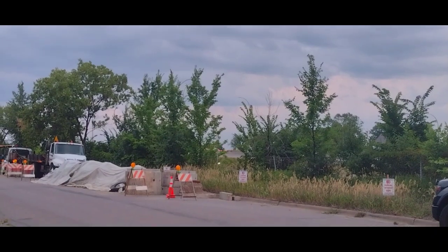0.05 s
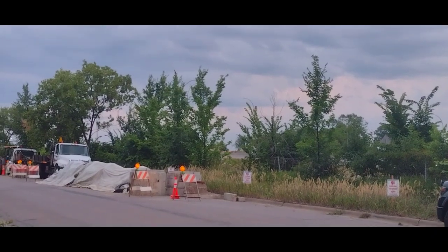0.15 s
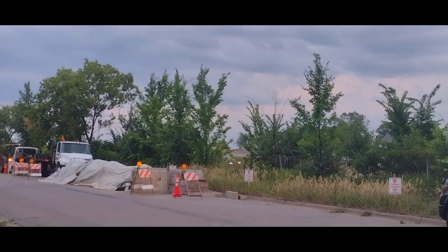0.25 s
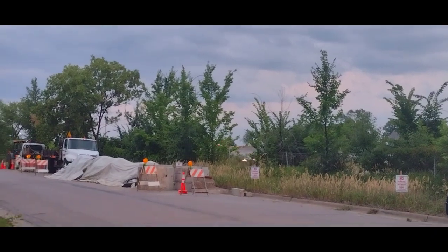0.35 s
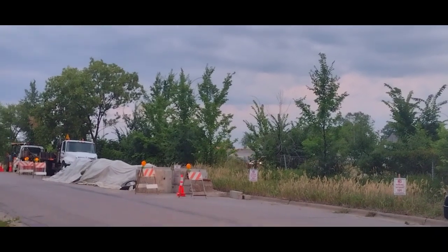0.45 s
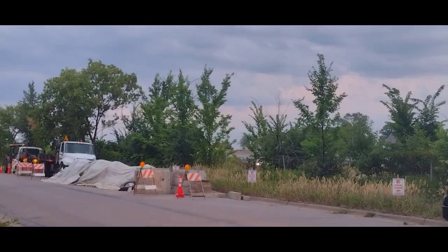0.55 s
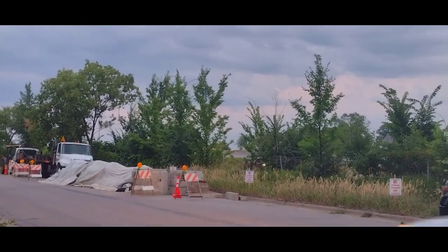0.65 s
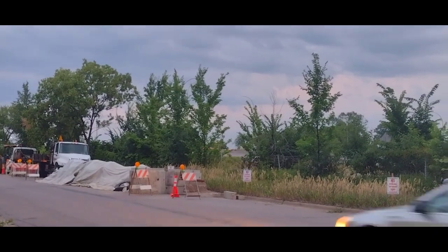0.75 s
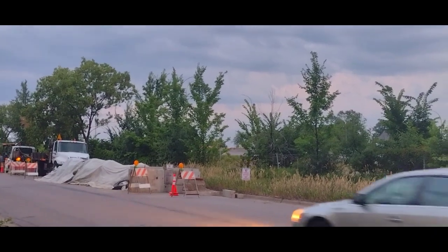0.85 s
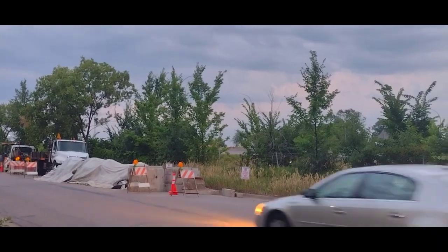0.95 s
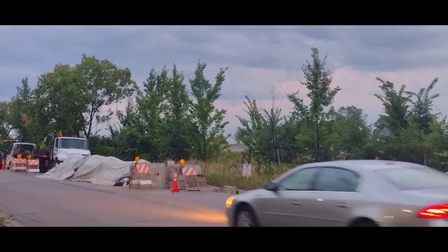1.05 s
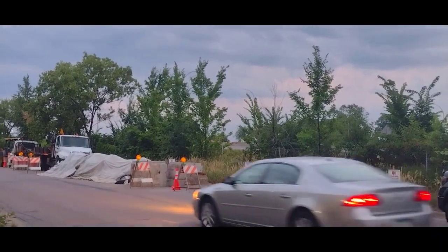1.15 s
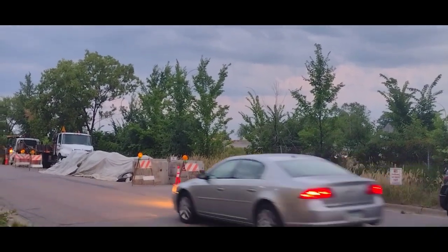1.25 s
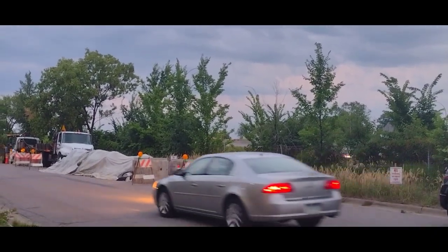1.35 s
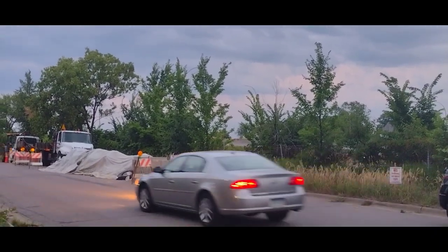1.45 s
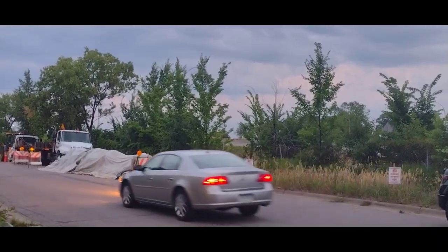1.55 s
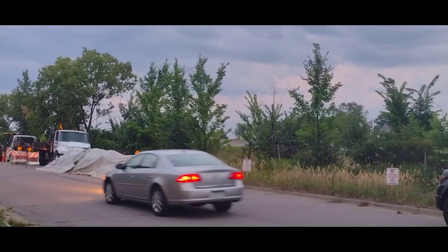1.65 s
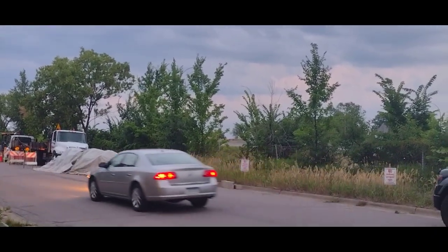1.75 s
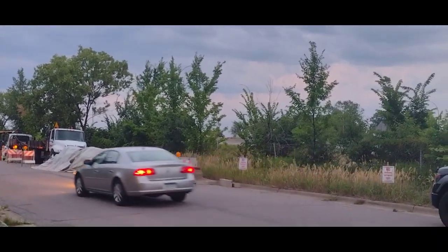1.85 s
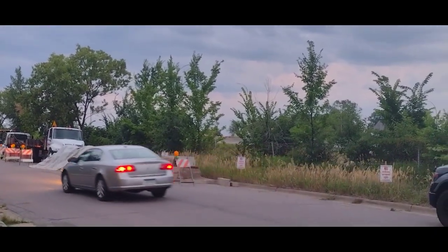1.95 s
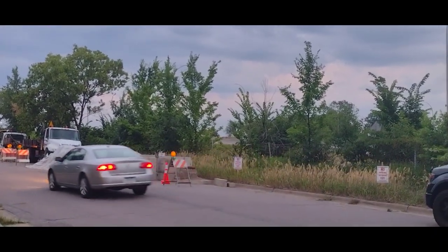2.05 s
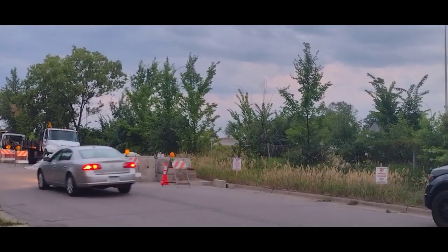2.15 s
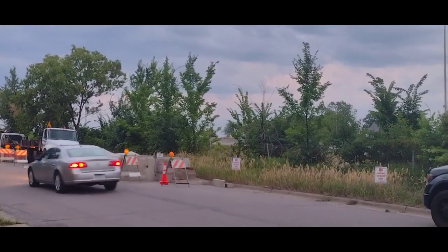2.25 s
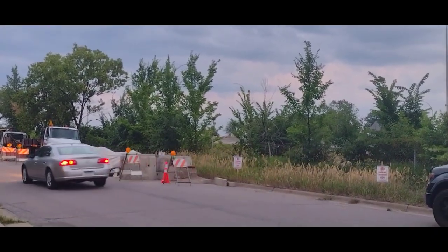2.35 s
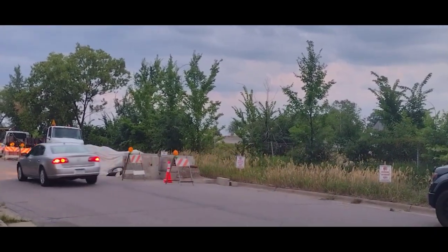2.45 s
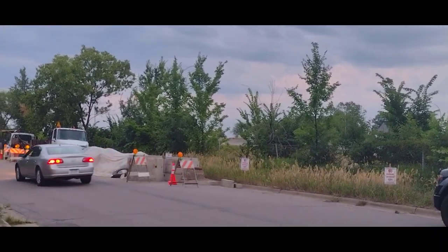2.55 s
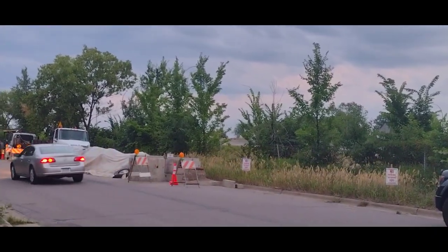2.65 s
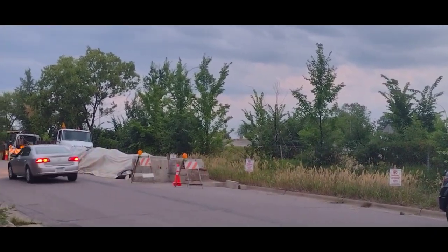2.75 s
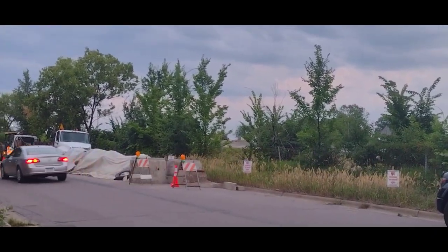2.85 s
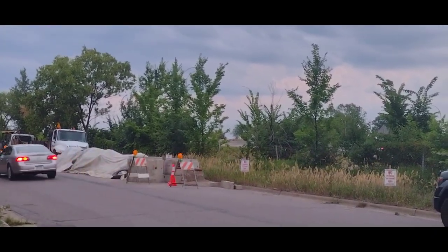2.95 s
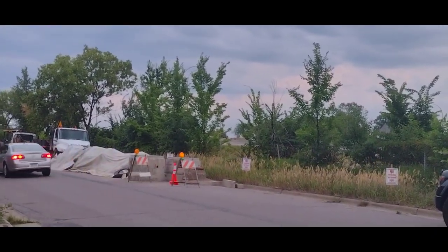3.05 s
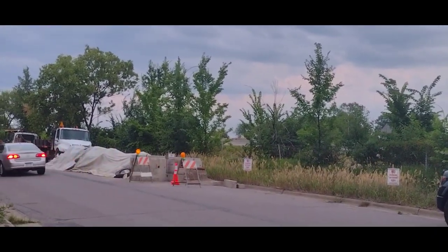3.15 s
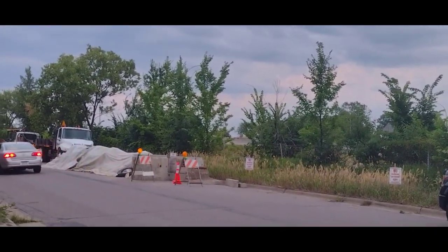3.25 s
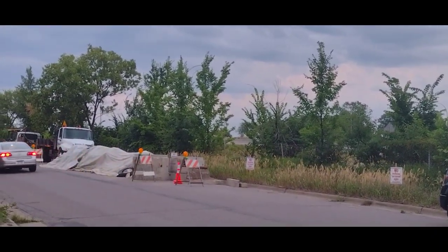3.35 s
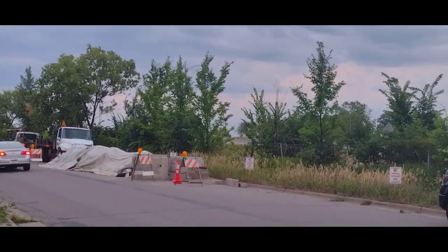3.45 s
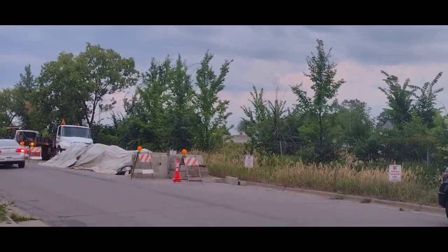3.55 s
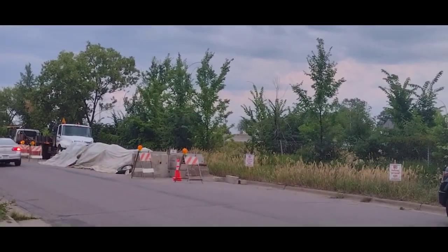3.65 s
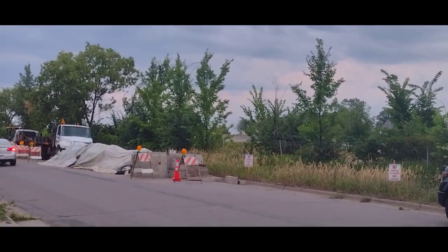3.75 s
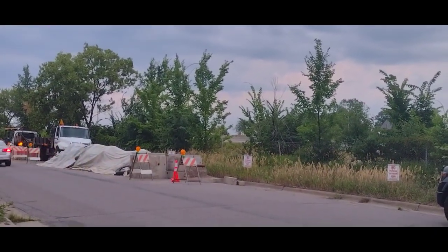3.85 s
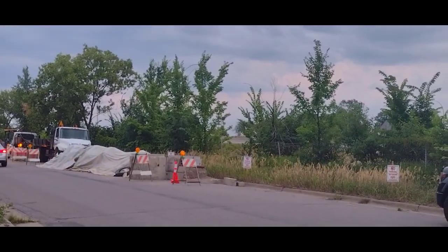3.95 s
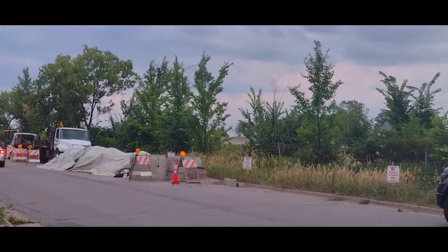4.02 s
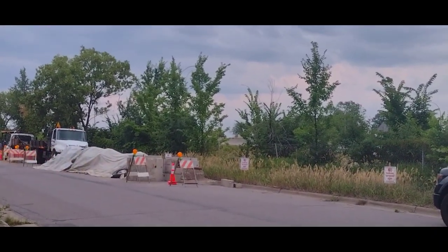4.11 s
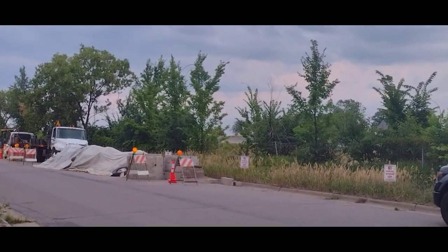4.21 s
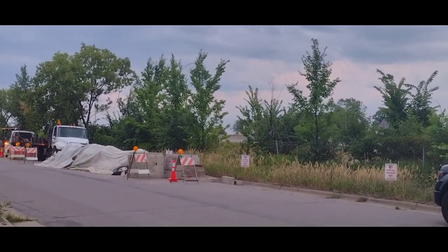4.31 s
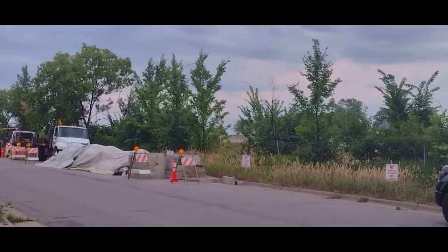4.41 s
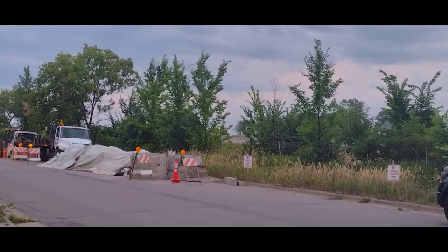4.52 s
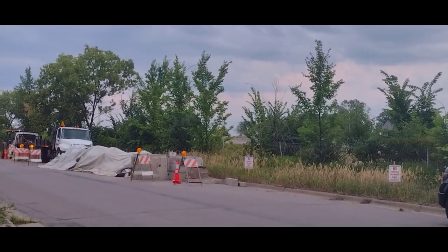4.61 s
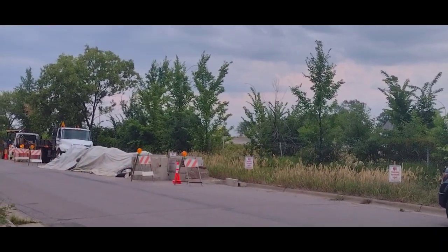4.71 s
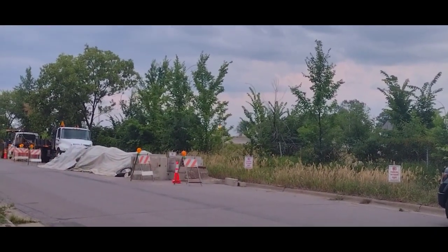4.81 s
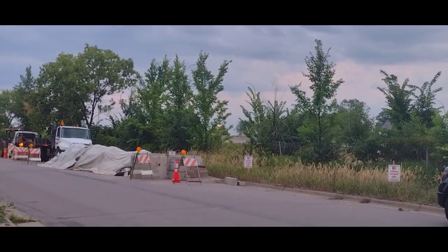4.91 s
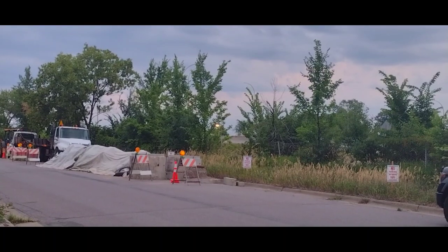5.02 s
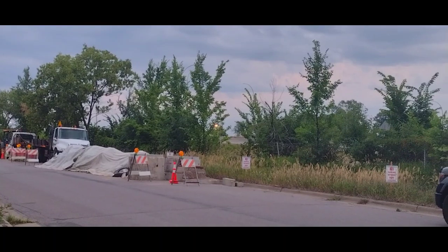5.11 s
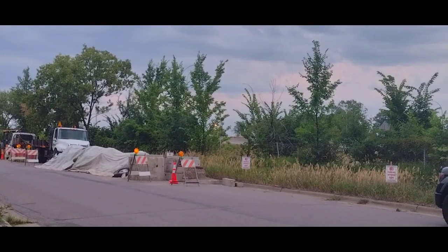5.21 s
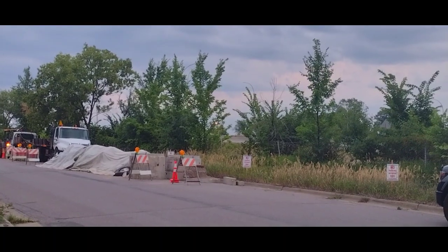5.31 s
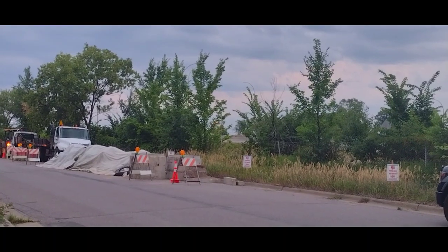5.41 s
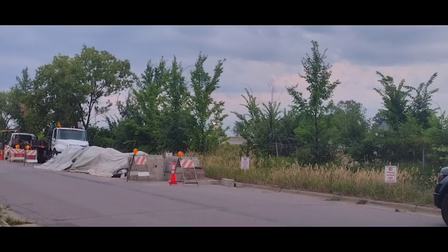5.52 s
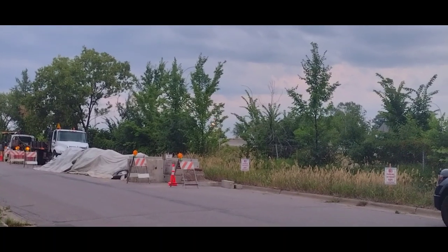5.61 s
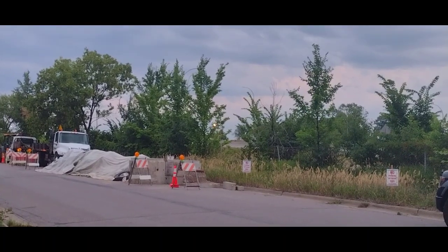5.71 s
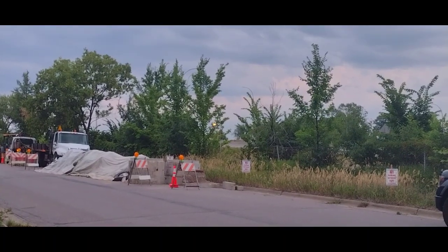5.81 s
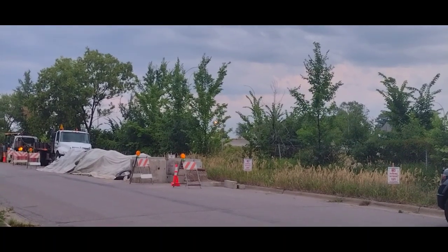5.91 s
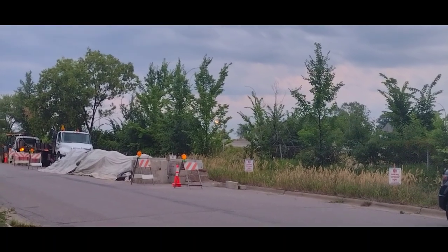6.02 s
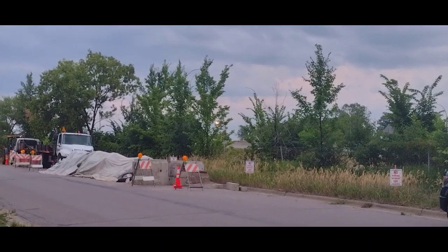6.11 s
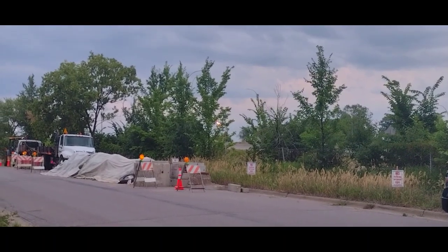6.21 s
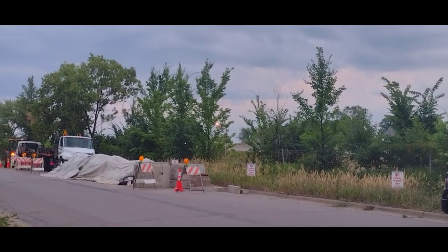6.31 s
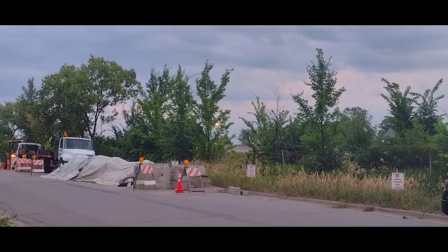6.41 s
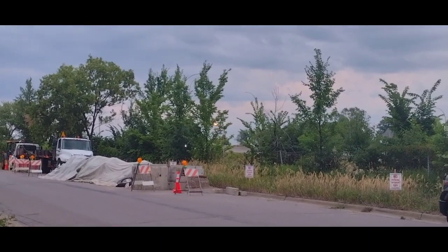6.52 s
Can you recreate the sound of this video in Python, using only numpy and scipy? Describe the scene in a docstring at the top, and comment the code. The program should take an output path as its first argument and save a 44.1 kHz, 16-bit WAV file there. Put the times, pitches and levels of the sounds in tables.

```python
"""Wind buffets thump, mostly on the left port, as a saloon car passes close by over main-road traffic.
The car drives off, its exhaust booming briefly; the rush of an approaching jet begins to rise at the end.
Wind, tyres, traffic and jet are coloured noise, steered by port delay or scattered all around.
The exhaust is a sum of sines on multiples of the firing rate; grit is sparse random ticks."""
import sys
import numpy as np
from scipy import signal
from scipy.fft import rfft, irfft, next_fast_len
from scipy.io import wavfile
from scipy.ndimage import uniform_filter1d, map_coordinates

SR = 44100
rng = np.random.default_rng(int(sys.argv[2]) if len(sys.argv) > 2 else 0)


def wav_out(sig):
    """Save sig, one row per channel (or a flat mono array), as 16-bit PCM at SR to the path in sys.argv[1]."""
    wavfile.write(sys.argv[1], SR, np.round(np.clip(np.atleast_2d(sig).T, -1, 1) * 32767).astype(np.int16))


N = 289737
TIME = np.arange(N) / SR


def amp(db):
    """Decibels to gain."""
    return 10 ** (np.asarray(db) / 20)


def unit(x):
    """Scale to rms 1, all channels together."""
    return x / np.sqrt(np.mean(x ** 2) + 1e-20)


def along(points, hz):
    """Read (f/Hz, value) points on a log frequency axis."""
    f, value = np.transpose(points)
    return np.interp(np.log(hz + 1), np.log(f + 1), value)


def curves(rows):
    """One value per sample for each column after the time."""
    t_s, *columns = np.transpose(rows)
    return [np.interp(TIME, t_s, column) for column in columns]


def wobble(knots_per_s):
    """Smooth random curve through normally distributed knots."""
    knots = rng.standard_normal(int(N * knots_per_s / SR) + 4)
    return map_coordinates(knots, [TIME * knots_per_s])


def swell(t_s, length_s):
    """Bell-shaped rise and fall around t_s = 0, down to exp(-2) at +-length_s."""
    return np.exp(-2 * (t_s / length_s) ** 2)


def filtered(x, response):
    """Multiply the spectrum of x by a response of frequency."""
    n = x.shape[-1]
    padded = next_fast_len(n + 2 ** 13, True)
    spectrum = rfft(x, padded) * response(np.fft.rfftfreq(padded, 1 / SR))
    return irfft(spectrum, padded)[..., :n]


def noise(spectrum):
    """Coloured noise, rms 1."""
    return unit(filtered(rng.standard_normal(N), lambda hz: amp(along(spectrum, hz))))


# likeness of scattered sound at the two ports: f/Hz, correlation
PORT_LIKENESS = [(60, 0.94), (250, 0.83), (400, 0.66), (650, 0.3), (1000, -0.27), (1400, -0.44),
                 (2200, 0.23), (4000, -0.048)]


def scattered(spectrum):
    """Stereo noise from all around: most alike at both ports in the bass, rms 1."""
    def response(hz):
        turn_rad = np.arccos(np.clip(along(PORT_LIKENESS, hz), -1, 1)) / 2
        return amp(along(spectrum, hz)) * [np.cos(turn_rad), np.sin(turn_rad)]
    mid, side = filtered(rng.standard_normal((2, N)), response)
    return unit(np.array([mid + side, mid - side]))


def delayed(x, delay_ms):
    """x after a fixed or moving delay."""
    return map_coordinates(x, [np.arange(N) - delay_ms * SR / 1000], mode="mirror")


def arriving(x, lag_ms):
    """Sound from the right (lag_ms > 0) reaches the left port later."""
    return np.array([delayed(x, lag_ms), x])


def rush(spectrum, lag_ms, direct):
    """Noise near rms 1: a power share comes straight from its bearing, the rest off road and trees."""
    share = np.clip(direct, 0, 1)
    straight = np.sqrt(share) * arriving(noise(spectrum), lag_ms)
    return straight + np.sqrt(1 - share) * scattered(spectrum)


def patchy(pair, depth_db):
    """Moving air and shifting reflections lift and sink narrow bands for a quarter second or so."""
    bins = signal.stft(pair, nperseg=1024)[2]
    field = rng.standard_normal(bins.shape[1:])
    field = uniform_filter1d(field, size=5, axis=0)  # over frequency
    field = uniform_filter1d(field, size=24, axis=1)  # over time
    shaped = bins * amp(depth_db * unit(field))
    return unit(signal.istft(shaped, nperseg=1024)[1][:, :N])


# turbulence spectrum before the cutoff: f/Hz, level/dB per Hz (relative)
EDDY_SPECTRUM = [(15, -36), (45, -20), (90, 2), (160, 3), (250, 4.5)]


def eddies(top_hz, size):
    """Low turbulent pressure on a port, cut off steeply above top_hz, rms 1."""
    def response(hz):
        return amp(along(EDDY_SPECTRUM, hz)) / np.sqrt(1 + (hz / top_hz) ** 9)
    return unit(filtered(rng.standard_normal(size), response))


# hardest wind thumps, left port: t/s, level/dB, length/s, top f/Hz
WIND_THUMPS = [(0.017, -23, 0.034, 270), (0.046, -19, 0.016, 325), (0.221, -13.5, 0.018, 345),
               (0.246, -12.5, 0.024, 375), (0.269, -8.5, 0.0099, 320), (0.3, -23.5, 0.039, 228),
               (0.344, -18, 0.023, 288), (.489, -24.5, 0.021, 260), (0.672, -17.5, 0.021, 207),
               (.725, -26, 0.067, 260), (.87, -23.5, 0.031, 150), (0.913, -20.5, 0.035, 153)]
# gusts full of small eddies: t/s, level/dB, length/s, port (0 left, 1 right)
WIND_GUSTS = [(0.357, -30, 0.3, 0), (0.486, -31, 0.11, 1), (0.784, -31, 0.085, 0), (1.336, -28.5, 0.16, 0)]
# thin wind hiss: t/s, level/dB, half length/s
WIND_SIZZLES = [(0.155, -57, 0.045), (0.243, -50, 0.029)]
# thin hiss, also colours the tyre grit: f/Hz, level/dB per Hz (relative)
SIZZLE_SPECTRUM = [(2000, -43), (6500, -7), (8500, 1), (12000, -8), (15500, -3)]
GUST_TOP_HZ, GUST_LUMPS_DB, GUST_LUMP_KNOTS_PER_S = 154, 1.5, 27


def wind():
    """Big eddies thump on the left port, gusts flutter with small ones, and thin hiss sizzles early on."""
    out = np.zeros((2, N + SR))
    t_s = np.arange(-SR // 8, SR // 8) / SR
    for centre_s, db, length_s, top_hz in WIND_THUMPS:
        shape = swell(t_s, length_s)
        thump = shape * eddies(top_hz, size=len(t_s))
        thump *= np.linalg.norm(shape) / np.linalg.norm(thump)  # same energy at every draw
        start = round((centre_s + t_s[0]) * SR) + SR // 2  # half a second of lead-in
        out[0, start:][:len(t_s)] += amp(db) * thump
    out = out[:, SR // 2:][:, :N]
    for centre_s, db, length_s, port in WIND_GUSTS:
        lumps = amp(GUST_LUMPS_DB * wobble(GUST_LUMP_KNOTS_PER_S))
        flutter = unit(lumps * eddies(GUST_TOP_HZ, size=N))
        out[int(port > 0.5)] += amp(db) * swell(TIME - centre_s, length_s) * flutter
    sizzle = sum(amp(db) / (1 + np.abs((TIME - centre_s) / half_s) ** 10)
                 for centre_s, db, half_s in WIND_SIZZLES)
    return out + sizzle * scattered(SIZZLE_SPECTRUM)


# main road: t/s, rumble level/dB (before RUMBLE_GAIN_DB), tyre wash level/dB
ROAD_LEVELS = [(0.0, -42, -35.5), (0.22, -46, -40), (0.4, -41, -41.5), (1.08, -42, -44), (1.74, -45.5, -38),
               (2.25, -48, -37.5), (3.55, -48, -43.5), (4.48, -41, -41.5), (5.05, -45, -42),
               (5.55, -43.5, -41), (5.67, -47, -42), (6.57, -48, -41.5)]
# tyre wash, low rumble, single car's tyres: f/Hz, level/dB per Hz (relative)
WASH_SPECTRUM = [(40, -30), (200, 3), (320, -5), (520, -7.5), (700, -1), (950, 0), (1400, -0.5), (1800, -5),
                 (2400, -13.5), (3200, -28.5), (4600, -33), (7000, -46.5), (15000, -63)]
RUMBLE_SPECTRUM = [(15, -53.5), (30, -17), (48, -9.5), (68, 8), (88, 6.5), (115, 6.5), (170, 0.5),
                   (260, -17), (500, -59.5), (2000, -100)]
FAR_CAR_SPECTRUM = [(500, -30), (1150, -10), (1500, 6), (1800, 2), (2300, -20), (4000, -47), (9000, -80)]
RUMBLE_GAIN_DB = 3.5
FAR_CAR_S, FAR_CAR_LENGTH_S, FAR_CAR_DB = 5.36, 0.57, -49


def traffic():
    """Main road to the right: a wash of tyres over a heaving rumble, and one car that stands out."""
    rumble_db, wash_db = curves(ROAD_LEVELS)
    wash = patchy(rush(WASH_SPECTRUM, lag_ms=0.41, direct=0.23), depth_db=2.35)
    wash = amp(wash_db + 0.2 * wobble(5)) * wash
    rumble = amp(rumble_db + RUMBLE_GAIN_DB + 1.0 * wobble(10.0)) * scattered(RUMBLE_SPECTRUM)
    far_car = rush(FAR_CAR_SPECTRUM, lag_ms=0.46, direct=0.4)
    far_car = amp(FAR_CAR_DB) * swell(TIME - FAR_CAR_S, FAR_CAR_LENGTH_S) * far_car
    return wash + rumble + far_car


ABEAM_S, SPEED_M_PER_S, NEAREST_M = 0.46, 6.54, 5.38


def car_place():
    """Car's angle/rad past the nearest point of the road, and distance over nearest distance."""
    ahead = SPEED_M_PER_S * (TIME - ABEAM_S) / NEAREST_M
    return np.arctan(ahead), np.hypot(1, ahead)


FACING_RAD, PORT_GAP_MS = 0.902, 0.473  # ports face this far down the road; travel time between them


def car_lag_ms():
    """Left port's delay as the car crosses from right to left."""
    return PORT_GAP_MS * np.sin(FACING_RAD - car_place()[0])


SCREENED_S = 3.7  # from here on parked trucks hide the car more and more


def passing(abeam_db, doubling_db, rear_db, lengthwise_db, screen_db_per_s):
    """Level/dB of a car part: falls per doubling of distance, beams rearward or lengthwise, is screened."""
    angle_rad, distance = car_place()
    beam_db = rear_db * np.sin(angle_rad) + lengthwise_db * np.sin(angle_rad) ** 2
    screen_db = screen_db_per_s * np.maximum(TIME - SCREENED_S, 0)
    return abeam_db - doubling_db * np.log2(distance) + beam_db - screen_db


def turning(abeam, behind, turn_s, span_s):
    """Side-on sound gives way to the sound from behind at equal power."""
    angle_rad = np.pi / 4 * (1 + np.tanh((TIME - turn_s) / span_s))
    return np.cos(angle_rad) * abeam + np.sin(angle_rad) * behind


ECHO_MS, ECHO_GROWTH_MS_PER_S = 0.14, 0.031  # delay at t = 0 and its growth


def reflected(pair, strength):
    """A reflection just behind the direct sound combs the treble; its growing delay sinks the comb."""
    echo_ms = ECHO_MS + ECHO_GROWTH_MS_PER_S * TIME
    return unit(pair + strength * np.array([delayed(x, echo_ms) for x in pair]))


def grit(ticks_per_s, spread_db):
    """Sparse ticks of sand crushed under the tyres, rms 1."""
    size_db = spread_db * np.minimum(rng.exponential(size=N), 3)
    sizes = amp(size_db) * rng.standard_normal(N)
    ticks = (rng.random(N) < ticks_per_s / SR) * sizes
    return unit(filtered(ticks, lambda hz: amp(along(SIZZLE_SPECTRUM, hz))))


# tread roar, rubber scrub, groove hiss and wheel whistle: f/Hz, level/dB per Hz (relative)
TREAD_ABEAM_SPECTRUM = [(200, -71.5), (560, -28), (740, -5), (850, -3), (945, 3.5), (1060, -1.5),
                        (1300, -11.5), (1700, -21.5), (3000, -72), (5000, -110)]
TREAD_BEHIND_SPECTRUM = [(200, -72.5), (600, -13), (800, -2.5), (1000, 1.5), (1260, 2), (1430, -29),
                         (2000, -29.5), (5000, -110)]
SCRUB_ABEAM_SPECTRUM = [(60, -42), (450, -2.5), (750, 2), (1200, -15.5), (1550, -9.5), (1780, -3),
                        (1950, 4), (2200, -1), (2500, -2), (2950, -6.5), (3300, -16.5), (7000, -86)]
SCRUB_BEHIND_SPECTRUM = [(400, -44), (1200, -11), (1600, 5), (2050, 1.5), (2450, -2.5), (2900, -16.5),
                         (3300, -28.5), (7000, -93.5)]
HISS_ABEAM_SPECTRUM = [(1000, -47.5), (3300, 3), (4500, 2.5), (6300, -4), (8200, -9.5), (10000, -7.5),
                       (11500, -19.5), (15500, -16.5)]
HISS_BEHIND_SPECTRUM = [(1000, -45), (3400, -1.5), (4900, 4), (5900, -0.5), (7000, -11.5), (8400, -7),
                        (9700, -12.5), (10700, -20), (15500, -20.5)]
WHISTLE_SPECTRUM = [(4000, -70), (9000, -33.5), (9620, 10), (10200, -32), (16000, -62)]
# thin high whistles from the wheels: t/s, level/dB, length/s
WHEEL_WHISTLES = [(1.53, -67.5, .12), (1.85, -69, 0.25)]
HORN_RAD, HORN_WIDTH_RAD, HORN_DB = 0.71, 0.18, 3  # tyre-road wedge beams the tread roar at this angle


def tyres():
    """Tread blocks roar near 1 kHz; rubber scrubs, air hisses out of the grooves and grit crackles."""
    tread_db = passing(abeam_db=-41.5, doubling_db=4.5, rear_db=19.0, lengthwise_db=-8.0, screen_db_per_s=6.0)
    scrub_db = passing(abeam_db=-38.5, doubling_db=8.9, rear_db=-0.64, lengthwise_db=9.0, screen_db_per_s=3.0)
    hiss_db = passing(abeam_db=-52.5, doubling_db=15.0, rear_db=0.9, lengthwise_db=13.0, screen_db_per_s=4.0)
    tread_db = tread_db + HORN_DB * swell(car_place()[0] - HORN_RAD, HORN_WIDTH_RAD)
    lag_ms = car_lag_ms()

    tread = turning(rush(TREAD_ABEAM_SPECTRUM, lag_ms, direct=0.51),
                    rush(TREAD_BEHIND_SPECTRUM, lag_ms, direct=0.48), turn_s=3.42, span_s=0.92)
    tread = amp(tread_db + 0.8 * wobble(9)) * tread

    scrub = turning(rush(SCRUB_ABEAM_SPECTRUM, lag_ms, direct=0.27),
                    rush(SCRUB_BEHIND_SPECTRUM, lag_ms, direct=0.32), turn_s=1.38, span_s=0.48)
    scrub = amp(scrub_db) * patchy(reflected(scrub, strength=0.15), depth_db=0.5)

    hiss = turning(rush(HISS_ABEAM_SPECTRUM, lag_ms, direct=0.15),
                   rush(HISS_BEHIND_SPECTRUM, lag_ms, direct=0.32), turn_s=1.88, span_s=0.27)
    hiss = patchy(reflected(hiss, strength=0.25), depth_db=1.5)
    hiss = amp(hiss_db + 0.87 * wobble(120)) * hiss  # coarse asphalt roughens it

    crackle = amp(hiss_db - 28.5) * arriving(grit(ticks_per_s=400, spread_db=7.0), lag_ms)
    whistle_level = sum(amp(db) * swell(TIME - centre_s, length_s)
                        for centre_s, db, length_s in WHEEL_WHISTLES)
    whistle = whistle_level * rush(WHISTLE_SPECTRUM, lag_ms, direct=0.43)
    return tread + scrub + hiss + crackle + whistle


# body drone, engine growl: f/Hz, level/dB per Hz (relative)
DRONE_SPECTRUM = [(30, -39), (140, -5.5), (230, 1.5), (370, -5.5), (480, -12), (620, -24.5), (2500, -94.5)]
GROWL_SPECTRUM = [(30, -52), (120, -25), (210, -6.5), (270, -3.5), (340, 0.5), (410, -1), (500, -18.5),
                  (900, -50.5), (3000, -100)]
LOAD_S, LOAD_LENGTH_S, LOAD_DB = 3.67, 0.94, -47.5  # the engine growls as it pulls away


def car_body():
    """Rolling wheels and engine shake the body into a low drone, with a rough growl under load."""
    drone_db = passing(abeam_db=-33.0, doubling_db=6.5, rear_db=-1.5, lengthwise_db=4.0, screen_db_per_s=4.0)
    drone = amp(drone_db + 0.41 * wobble(11)) * rush(DRONE_SPECTRUM, car_lag_ms(), direct=0.61)
    growl = rush(GROWL_SPECTRUM, car_lag_ms(), direct=0.44)
    return drone + amp(LOAD_DB) * swell(TIME - LOAD_S, LOAD_LENGTH_S) * growl


# steady harmonics: multiple of firing rate, level/dB (relative)
PIPE_HARMONICS = [(1, -1), (3, -12), (4, 2), (5, 0), (6, -10)]
# brief engine hums: multiple of firing rate, t/s, level/dB, length/s
ENGINE_HUMS = [(1.5, 1.74, -39.5, 0.22), (3, 1.77, -36, 0.19), (3, 2.545, -41, 0.11), (2, 5.95, -45, 0.18),
               (2, 6.45, -45, 0.33)]
# pipe resonance on the second multiple: t/s, level/dB
PIPE_BOOM = [(2.3, -57), (2.52, -40.5), (3.07, -49.5), (3.3, -37.5), (3.7, -30.5), (3.93, -38.5),
             (4.03, -32), (4.63, -39), (4.68, -57)]
FIRING_START_HZ, FIRING_END_HZ, EASE_S = 80.86, 73.8, 2.1
BOOM_FADE_DB_PER_S = 48  # before and after the table


def exhaust():
    """Firing harmonics sink slowly, some hum briefly; the second booms in the pipe as the car draws away."""
    ease = np.exp(-(TIME / EASE_S) ** 2)
    firing_hz = FIRING_END_HZ + (FIRING_START_HZ - FIRING_END_HZ) * ease
    phase = 2 * np.pi * np.cumsum(firing_hz * (1 + 0.00512 * wobble(12))) / SR

    def tone(multiple):
        """Sine of rms 1 at a multiple of the firing rate, random start phase."""
        return np.sqrt(2) * np.sin(multiple * phase + rng.uniform(0, 2 * np.pi))

    pipe_db = passing(abeam_db=-52.0, doubling_db=4.0, rear_db=4.5, lengthwise_db=9.5, screen_db_per_s=8.5)
    harmonics = sum(amp(db + 2.2 * wobble(7)) * tone(multiple) for multiple, db in PIPE_HARMONICS)
    hums = sum(amp(db) * swell(TIME - centre_s, length_s) * tone(multiple)
               for multiple, centre_s, db, length_s in ENGINE_HUMS)
    outside_s = np.abs(TIME - np.clip(TIME, PIPE_BOOM[0][0], PIPE_BOOM[-1][0]))
    boom = amp(curves(PIPE_BOOM)[0] - BOOM_FADE_DB_PER_S * outside_s) * tone(2)
    return arriving(amp(pipe_db) * unit(harmonics) + hums + boom, car_lag_ms())


# jet rush: f/Hz, level/dB per Hz (relative)
JET_SPECTRUM = [(40, -29), (240, 8), (500, -8.5), (740, 7), (1000, 5), (1400, -12), (2080, 5), (2600, -12),
                (3200, -33), (12000, -97)]
JET_START_S, JET_RISE_S, JET_DB = 6.02, 0.54, -44.5  # JET_DB is reached JET_RISE_S after the start


def jet():
    """The far jet's rush gains power steadily, dulled by distance and wavering in the moving air."""
    power = np.maximum(TIME - JET_START_S, 0) / JET_RISE_S
    roar = patchy(rush(JET_SPECTRUM, lag_ms=0.58, direct=0.14), depth_db=3.0)
    return np.sqrt(power) * amp(JET_DB + 0.47 * wobble(7.9)) * roar


def scene():
    """Wind, traffic, car and jet at the two ports."""
    return wind() + traffic() + tyres() + car_body() + exhaust() + jet()


# port colour: f/Hz, left minus right level/dB
PORT_DIFFERENCE = [(300, -0.1), (900, -.5), (1700, -2), (2700, 2), (3500, 0.5), (4400, 8), (5300, 9.5),
                   (6800, 4.5), (9000, 2.5), (13000, 1)]
TOP_HZ = 15760


def record(dry):
    """The two ports differ in colour; the preamplifier adds faint hiss below the band limit."""
    def ports(hz):
        tilt = amp(np.outer([1, -1], along(PORT_DIFFERENCE, hz)) / 2)
        return tilt / np.sqrt(np.mean(tilt ** 2, axis=0))  # keeps the mean power of the two
    heard = filtered(dry, ports) + amp(-83.0) * rng.standard_normal((2, N))
    return filtered(heard, lambda hz: hz < TOP_HZ)


dry = scene()
out = record(dry)
wav_out(out)
```